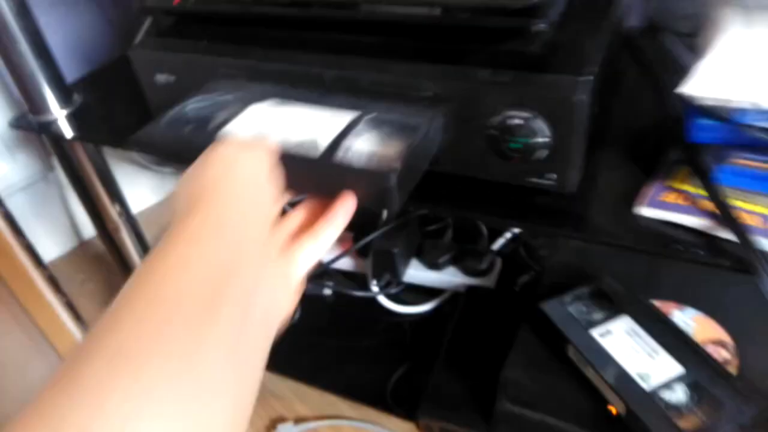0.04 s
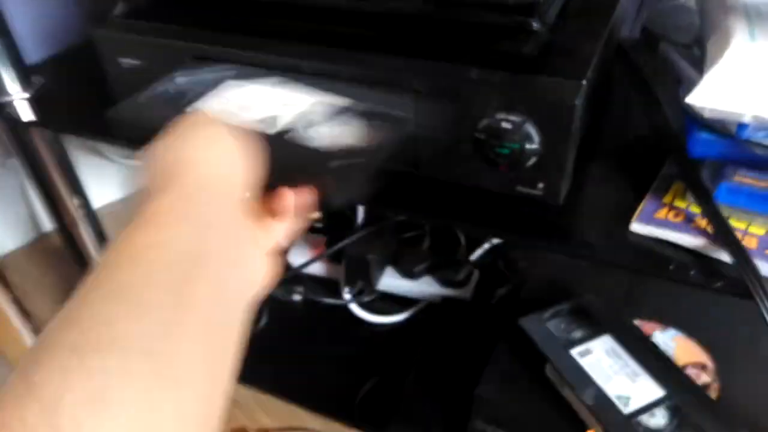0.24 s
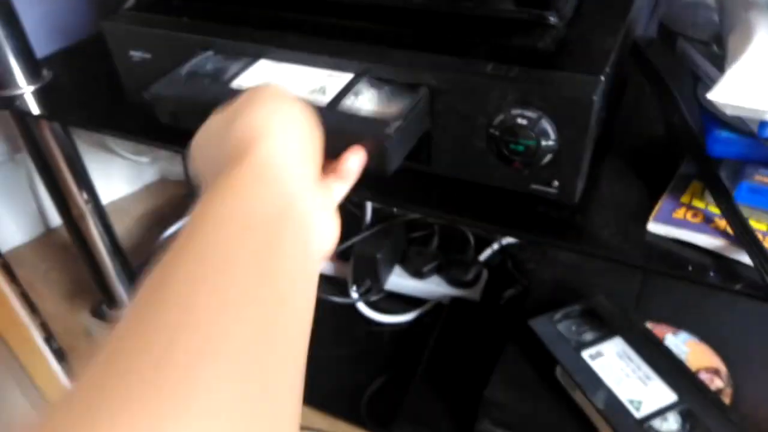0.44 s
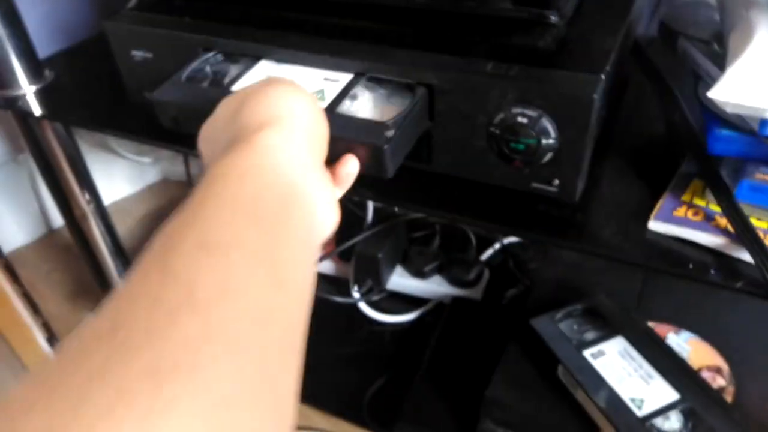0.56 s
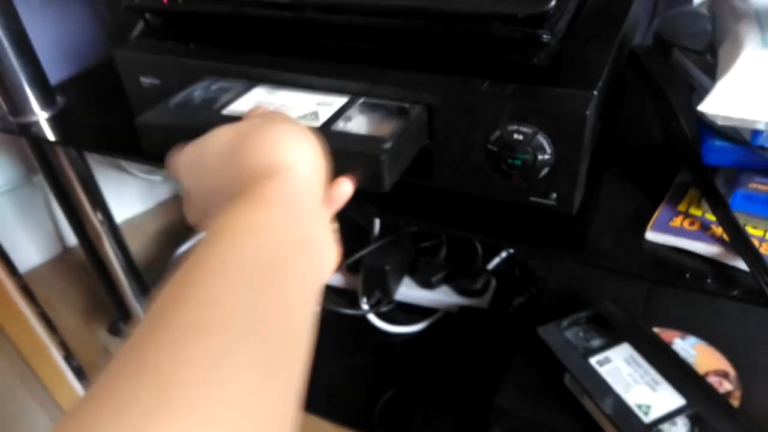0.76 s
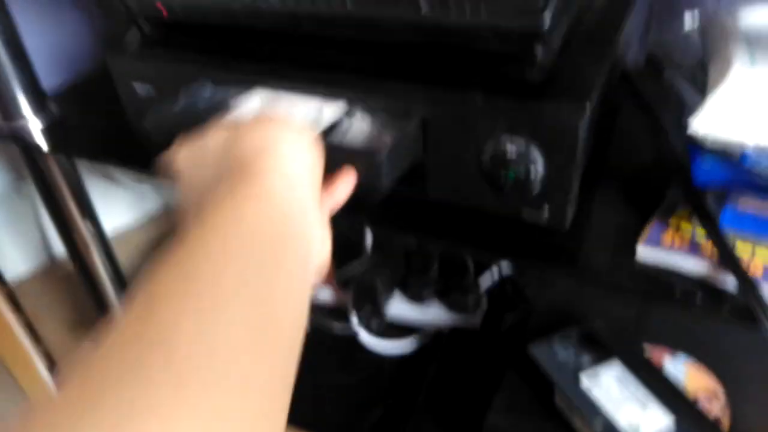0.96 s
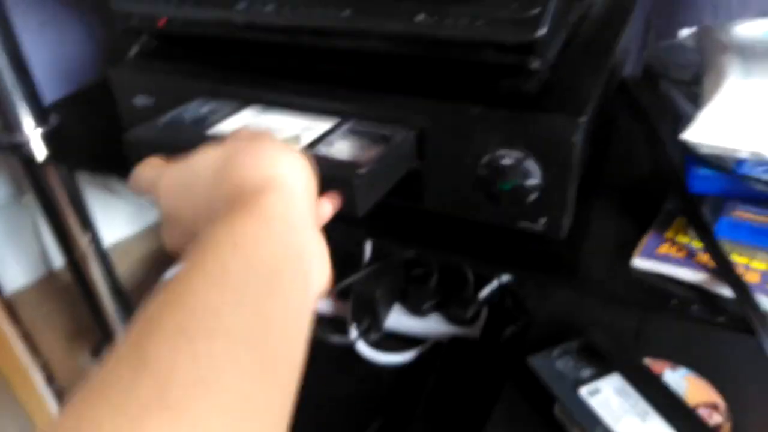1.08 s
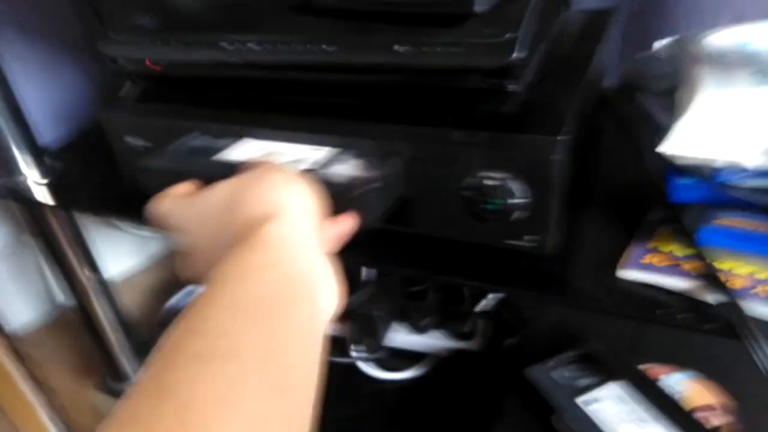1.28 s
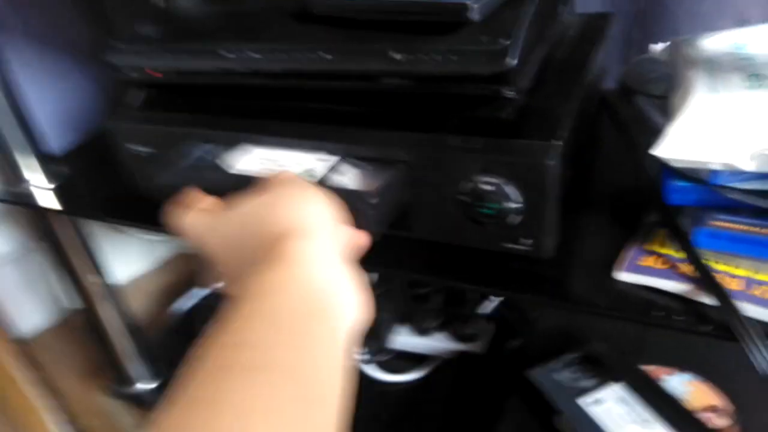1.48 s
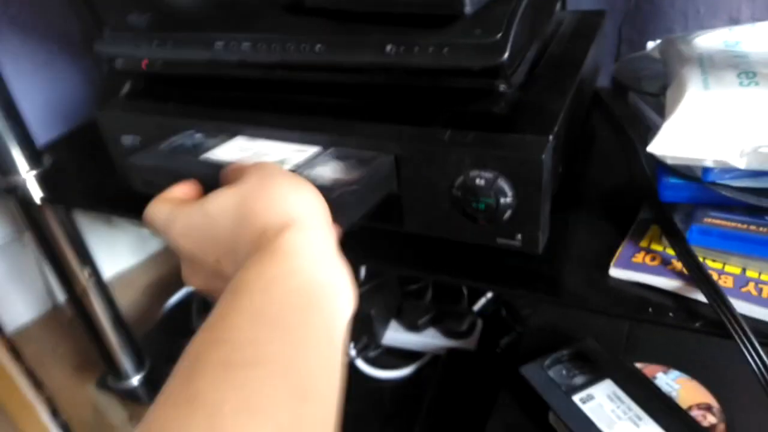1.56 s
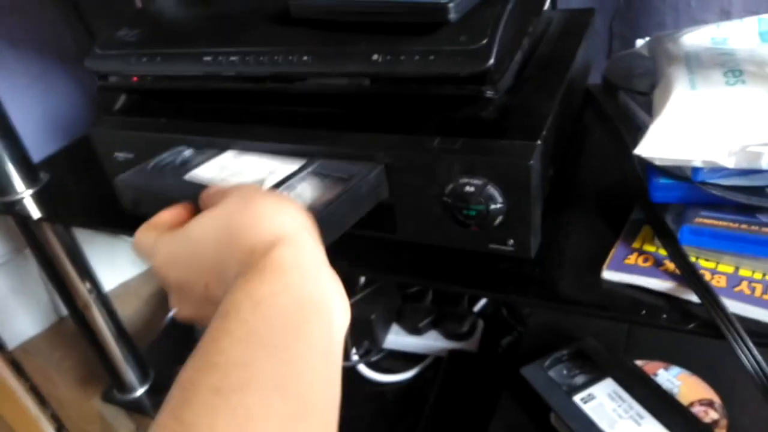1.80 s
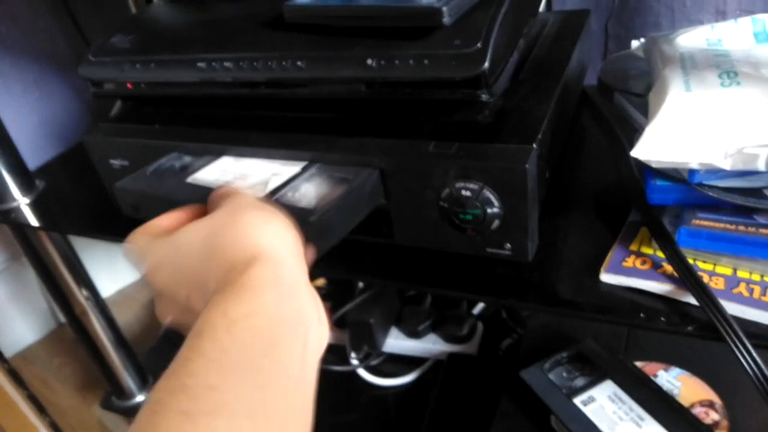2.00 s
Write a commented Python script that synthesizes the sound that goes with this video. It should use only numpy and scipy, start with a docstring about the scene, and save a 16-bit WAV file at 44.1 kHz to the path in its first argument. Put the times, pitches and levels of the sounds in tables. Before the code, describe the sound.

Plastic cassette clatter: a quick flurry of knocks, a short rough scrape, then uneven repeated shoves against a stop, with chattering ticks, faint hum and low handling bumps; close stereo, the left side muffled.

```python
"""Cassette knocked into a slot

A tape cassette knocks against the slot of a machine, then is shoved in again and again against a stop.
Each contact is a burst of noise and chattering ticks (plastic shell, loose reels), with a dull push and
decaying tones (hollow case), in a small live room. Two rough squeaks fall in pitch as the shell chafes.
Behind them are low finger bumps, mains hum, hiss and a rustle that dies away at the start.
The hand-held camera has a muffled, late left microphone and a limiter."""
import sys
import numpy as np
from scipy import signal
from scipy.fft import rfft, irfft, next_fast_len
from scipy.io import wavfile
from scipy.ndimage import uniform_filter1d, minimum_filter1d

SR = 44100
rng = np.random.default_rng(int(sys.argv[2]) if len(sys.argv) > 2 else 0)


def wrap_up_sound(samples):
    """Save the sound to the file named by the first command line argument, as 16-bit audio."""
    columns = np.atleast_2d(samples).T
    # keep every value between -1 and 1, then stretch to whole-number steps
    tamed = np.clip(columns, -1, 1)
    steps = np.round(tamed * 32767).astype(np.int16)
    wavfile.write(sys.argv[1], SR, steps)


N = 89875

ROOM_DB, CASE_ROOM_DB = -1, -8.5  # room tail against the direct sound; the ringing case gets less

# Every contact of the cassette: t/s, clack level/dB, case level/dB, bass boost or cut of the case/dB
CONTACTS = [(0.231, -5.5, -9, -1), (.257, -6.5, -13.5, -5), (.275, -6, -10.5, 5.5), (.305, -12, -17, 4),
            (.326, -10, -12.5, 0.5), (.411, -18.5, -25, -15), (0.427, -17, -32, -13),
            (.440, -15.5, -21, -19), (.452, -8.5, -12, -12.5), (.464, -4.5, -5, 3), (.593, -18, -16, -21),
            (.604, -9.5, -12, 1), (.639, -7.5, -10.5, -0.5), (.667, -13.5, -11.5, 0.5),
            (.785, -39, -27.5, -14), (.830, -21, -19.5, -6), (0.93, -24.5, -24.5, -21),
            (.954, -19, -18.5, -25), (.976, -6.5, -12.5, -6.5), (.987, -7.5, -9.5, 3),
            (1.070, -20.5, -22.5, -5), (1.149, -19, -19, -29), (1.176, -18.5, -22, 6),
            (1.253, -20.5, -21.5, -26), (1.281, -5.5, -8, -2), (1.304, -6.5, -10.5, 5.5),
            (1.445, -17.5, -21.5, -41), (1.472, -22, -21.5, -8), (1.487, -17, -18.5, -10),
            (1.539, -24, -25, -15), (1.565, -12, -12, -10), (1.571, -4.5, -10, 5), (1.589, -7, -13.5, 7),
            (1.684, -20, -24.5, -6), (1.727, -18, -22, -12), (1.745, -21, -41, 4), (1.798, -14, -54, -8),
            (1.812, -9.5, -10, 2), (1.826, -5.5, -10.5, 0), (1.905, -17, -34, 12),
            (1.957, -18.5, -31.5, -18), (2.021, -10.5, -35, -21)]
INSIDE_S = 0.87  # from here on the cassette sits in the slot
FULL_CLACK_DB, DULL_HZ, DULL_PER_DB = -11.5, 10000, 1.33  # softer clacks lose treble, mostly above DULL_HZ
CLACK_RISE_S = 0.00086


def cassette():
    """Every contact clacks the shell and rings the case in the room; the softer the clack, the duller."""
    out = np.zeros((2, N))
    t = np.arange(SR // 2) / SR
    for s, clack_db, case_db, bass_db in CONTACTS:
        dull_db = DULL_PER_DB * min(0, clack_db - FULL_CLACK_DB)
        crack = filtered(clack(t), lambda hz: amp(dull_db * hz ** 2 / (hz ** 2 + DULL_HZ ** 2)))
        crack = crack * (1 - np.exp(-t / CLACK_RISE_S))
        shell_sound = amp(clack_db) * in_room(crack, ROOM_DB)
        case_sound = amp(case_db) * case(t, s > INSIDE_S, bass_db)
        add(out, s, shell_sound + case_sound)
    return out


# Tone colour of the plastic shell: f/Hz, relative level per Hz/dB
SHELL_COLOUR = [(60, -28), (200, -16), (600, -9), (1200, -6), (2000, -7), (3500, -4), (5000, -.5),
                (6300, 1), (7300, -3), (8300, -8), (11000, -14), (15500, -19.5)]
CLACK_T60_S, TICK_T60_S, PANEL_T60_S = 0.055, 0.014, 0.061  # times to fade by 60 dB
RATTLE_STEP_S, RATTLE_DB, RATTLE_FADE_DB = 0.0055, -3, 2.94  # average spacing, first level, drop per tick
PANEL_DB = -1  # ringing of small plastic panels, against the noise of a tick


def clack(t, count=5, size=14):
    """The shell cracks as fading noise; loose reels and flap chatter after it, each tick in its own colour."""
    out = amp(-60 * t / CLACK_T60_S) * noise(SHELL_COLOUR, len(t))
    age = t[:SR // 12]
    for k in range(count):
        # small panels ring at random pitches, each as strong as the shell's colour there
        hz = rng.uniform(900, 12000, (size, 1))
        weight = amp(along(SHELL_COLOUR, hz))
        panels = (weight * np.sin(2 * np.pi * hz * age)).sum(0) / np.linalg.norm(weight)
        ringing = amp(PANEL_DB - 60 * age / PANEL_T60_S) * panels
        click = amp(-60 * age / TICK_T60_S) * noise(SHELL_COLOUR, len(age))
        start_s = RATTLE_STEP_S * (k + rng.random())
        tick_db = RATTLE_DB - RATTLE_FADE_DB * k + rng.normal(0, 1.03)
        add(out, start_s, amp(tick_db) * (ringing + click))
    return out


# Ringing tones of the hollow case, before small random changes:
# f/Hz, level with the cassette at the slot's mouth/dB, level with it inside/dB, time to fade by 60 dB/s
CASE_TONES = [(242.8, -4, -11.5, 0.28), (323.4, -7, 5, 0.17), (381.4, -18, -2, 0.14), (431, -2, -2.5, 0.05),
              (624.3, 1, 1.5, 0.16), (678, 1, -0.5, .18), (727.7, -2.5, -3, 0.15), (783.4, -6, 1.5, 0.12),
              (900, -7, -4, 0.24), (946, -18, -9.5, 0.11), (1135, -5, -1.5, 0.13), (1199, 1.5, -5.5, 0.15),
              (1310, -7, -9, 0.34), (1435, -24, -20, 0.21)]
# Tone colour of the dull push: f/Hz, relative level per Hz/dB
PUSH_COLOUR = [(40, -26), (100, -14.5), (200, -5), (330, -1.5), (500, -2), (700, 2), (1400, -2.5),
               (3000, -9.5), (8000, -47)]
PUSH_DB, PUSH_T60_S = 0, 0.081
RING_DB, CASE_RISE_S = -10, 0.0027
TONE_SPREAD_DB, DETUNE = 2, 0.0075  # random spread of the tones: level, and share of the pitch


def case(t, inside, bass_db):
    """A push of dull noise and the ringing tones of the case, a little different at every contact."""
    hz, mouth_db, inside_db, t60 = np.transpose(CASE_TONES)[:, :, None]
    size, detune = rng.standard_normal((2, len(CASE_TONES), 1))
    tone_db = (inside_db if inside else mouth_db) + TONE_SPREAD_DB * size
    tones = amp(tone_db - 60 * t / t60) * np.sin(2 * np.pi * hz * (1 + DETUNE * detune) * t)
    polarity = (-1) ** np.arange(len(CASE_TONES))[:, None]  # neighbours swing opposite ways
    ring = amp(RING_DB) * (polarity * bass_gain(hz, bass_db) * tones).sum(0)
    push = filtered(noise(PUSH_COLOUR, len(t)), lambda f: bass_gain(f, bass_db))
    push = amp(PUSH_DB - 60 * t / PUSH_T60_S) * push
    rise = 1 - np.exp(-t / CASE_RISE_S)
    return in_room(ring * rise, CASE_ROOM_DB) + in_room(push * rise, ROOM_DB)


BASS_EDGE_HZ = 384  # light touches hardly move the case below this


def bass_gain(hz, bass_db):
    """Raise or lower the bass under the edge and leave the rest alone."""
    return amp(bass_db / (1 + (hz / BASS_EDGE_HZ) ** 6))


# The shell chafes on the slot's lip: t/s, level/dB
CHAFES = [(.911, -19), (.934, -27)]
CHAFE_HZ, CHAFE_FALL_HZ_PER_S, CHAFE_T60_S = 1420, 11000, 0.075
CHAFE_ROUGHNESS = 0.8  # random jitter, as a share of the pitch


def chafing():
    """Short rough squeaks, falling in pitch, as the shell slides over the lip."""
    out = np.zeros((2, N))
    t = np.arange(SR // 3) / SR
    # f/Hz, relative level per Hz/dB
    scrape_colour = [(200, -20), (800, 0), (1400, -2), (2200, -13), (6000, -15), (12000, -40)]
    for s, db in CHAFES:
        falling_hz = np.maximum(CHAFE_HZ - CHAFE_FALL_HZ_PER_S * t, CHAFE_HZ / 2)
        hz = falling_hz * (1 + CHAFE_ROUGHNESS * rng.standard_normal(len(t)))
        tone = np.sin(2 * np.pi * np.cumsum(hz) / SR)
        squeak = tone + amp(-7) * noise(scrape_colour, len(t))
        envelope = amp(db - 60 * t / CHAFE_T60_S) * (1 - np.exp(-t / 0.003))
        add(out, s, in_room(envelope * squeak, ROOM_DB))
    return out


# Finger bumps on the camera: t/s, level/dB
FINGER_BUMPS = [(1.194, -23), (1.213, -19), (1.289, -22), (1.341, -21), (1.401, -15), (1.653, -22),
                (1.682, -11.5)]
# Tone colour of the tap within a bump: f/Hz, relative level per Hz/dB
TAP_COLOUR = [(30, -29), (70, -4), (150, 0), (300, 3), (600, -27), (2000, -70)]
SWING_HZ, SWING_T60_S, TAP_DB, TAP_T60_S = 68, 0.06, 1, 0.04  # the swing's pitch varies from bump to bump


def fingers():
    """Each bump of the grip is a low swing plus a noisy tap, on the left microphone only."""
    out = np.zeros((2, N))
    t = np.arange(SR // 5) / SR
    for s, db in FINGER_BUMPS:
        hz = SWING_HZ * (1 + 0.11 * rng.normal())
        swing = amp(-60 * t / SWING_T60_S) * np.sin(2 * np.pi * hz * t)
        tap = amp(TAP_DB - 60 * t / TAP_T60_S) * noise(TAP_COLOUR, len(t))
        add(out[0], s, amp(db) * (swing + tap) * (1 - np.exp(-t / 0.0019)))
    return signal.sosfilt(signal.butter(3, 45, 'high', fs=SR, output='sos'), out)


# Mains hum: f/Hz, rms level/dB
HUM_TONES = [(50, -41.5), (150, -60.5), (250, -71.5), (350, -76), (450, -77.5)]
# Tone colour of the hiss: f/Hz, relative level per Hz/dB
HISS_COLOUR = [(30, 11), (300, -13), (2000, -21), (15000, -24)]
# Tone colour of the rustle: f/Hz, relative level per Hz/dB
RUSTLE_COLOUR = [(100, -1), (900, 5), (3500, -8), (6000, 2), (9000, -8), (14000, -27)]
HISS_DB, RUSTLE_DB, RUSTLE_T60_S = -58.5, -48.5, 0.19  # rustle level is at its start


def background():
    """Steady hum tones over faint noise; a slight rustle dies away at the start."""
    t = np.arange(N) / SR
    hum = sum(np.sqrt(2) * amp(db) * np.sin(2 * np.pi * (hz * t + rng.random())) for hz, db in HUM_TONES)
    hiss = amp(HISS_DB) * noise(HISS_COLOUR, N)
    rustle = amp(RUSTLE_DB - 60 * t / RUSTLE_T60_S) * noise(RUSTLE_COLOUR, N)
    return hum + hiss + rustle


# How long the room rings: f/Hz, time to fade by 60 dB/s
ROOM_DECAY = [(150, 0.27), (1000, 0.27), (6000, 0.27), (15000, 0.17)]


def in_room(x, wet_db, split_hz=480, build_s=0.002):
    """A sound plus a fresh tail of fading noise, alike at both microphones only in the bass."""
    hz, t, z = signal.stft(rng.standard_normal((2, SR // 2)), SR, nperseg=256)
    turn = np.pi / 4 * (1 - np.exp(-(hz[:, None] / split_hz) ** 2))  # spreads the sides apart as pitch rises
    mid, side = z[0] * np.cos(turn), z[1] * np.sin(turn)
    fade = amp(-60 * t / along(ROOM_DECAY, hz)[:, None]) * (1 - np.exp(-t / build_s))
    tail = signal.istft(np.array([mid + side, mid - side]) * fade, SR, nperseg=256)[1]
    tail = tail / np.linalg.norm(tail[0])
    return x + amp(wet_db) * signal.fftconvolve(x[None], tail, axes=1)[:, :len(x)]


def amp(db):
    """Turn decibels into a plain multiplier."""
    return 10 ** (np.asarray(db) / 20)


def unit(x):
    """Scale a sound to rms 1."""
    return x / np.sqrt(np.mean(x ** 2) + 1e-20)


def along(points, hz):
    """Read a value between (f/Hz, value) points on a log axis."""
    f, v = np.transpose(points)
    return np.interp(np.log(hz + 1), np.log(f + 1), v)


def filtered(x, response):
    """Multiply the spectrum of x by a response that depends on frequency."""
    m = next_fast_len(x.shape[-1] + 8192)  # spare room at the end for the filter to ring out
    return irfft(rfft(x, m) * response(np.fft.rfftfreq(m, 1 / SR)), m)[..., :x.shape[-1]]


def noise(colour, size):
    """Noise with a given tone colour and rms 1."""
    return unit(filtered(rng.standard_normal(size), lambda hz: amp(along(colour, hz))))


def add(track, s, sound):
    """Mix a sound into a track from time s, cutting off what runs past the end."""
    part = track[..., round(s * SR):][..., :sound.shape[-1]]
    part += sound[..., :part.shape[-1]]


def scene():
    """All the sources together, before the microphones and limiter."""
    return cassette() + chafing() + fingers() + background()


# Muffling of the left microphone: f/Hz, level/dB
LEFT_MUFFLE = [(100, -0.5), (330, -4), (650, -5), (1000, -10), (1450, -6.5), (2400, -9.5), (4000, -21.5),
               (6300, -30.5), (10000, -23), (15000, -21)]
LEFT_LAG_S, TOP_HZ = 0.00033, 16000  # nothing passes from TOP_HZ up
LIMIT_DB, LIMIT_WINDOW_S, LIMIT_HOLD_S = -8, 0.002, 0.008


def record(dry):
    """The left microphone is dull and late; a limiter turns both sides down together when it gets loud."""
    def left_response(hz):
        """Muffle the sound and delay it."""
        return amp(along(LEFT_MUFFLE, hz)) * np.exp(-2j * np.pi * hz * LEFT_LAG_S)

    pair = np.array([filtered(dry[0], left_response), dry[1]])
    window = max(2, int(LIMIT_WINDOW_S * SR))
    hold = max(2, int(LIMIT_HOLD_S * SR))
    # the louder side sets the gain, which stays down for the hold time
    level = np.sqrt(np.abs(uniform_filter1d(pair ** 2, window, axis=1)).max(0)) + 1e-9
    gain = minimum_filter1d(np.minimum(1, amp(LIMIT_DB) / level), hold, origin=(hold - 1) // 2)
    limited = np.clip(pair * uniform_filter1d(gain, window), -1, 1)
    return filtered(limited, lambda hz: hz < TOP_HZ)


dry = scene()
out = record(dry)
wrap_up_sound(out)
```